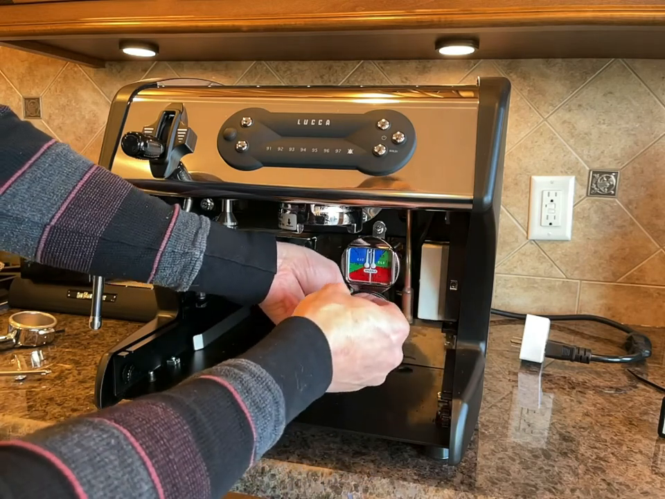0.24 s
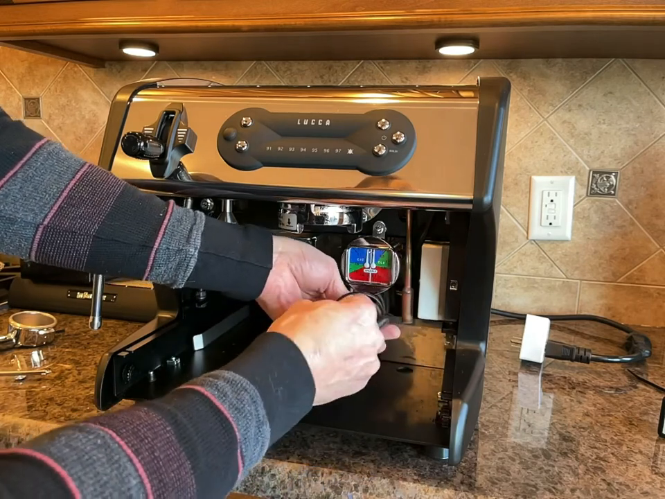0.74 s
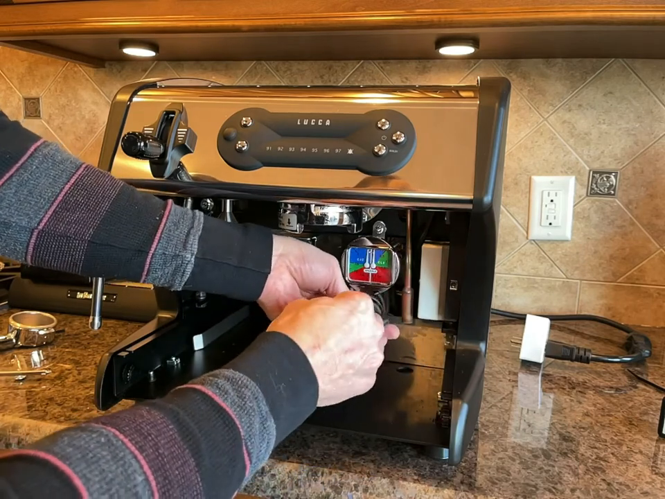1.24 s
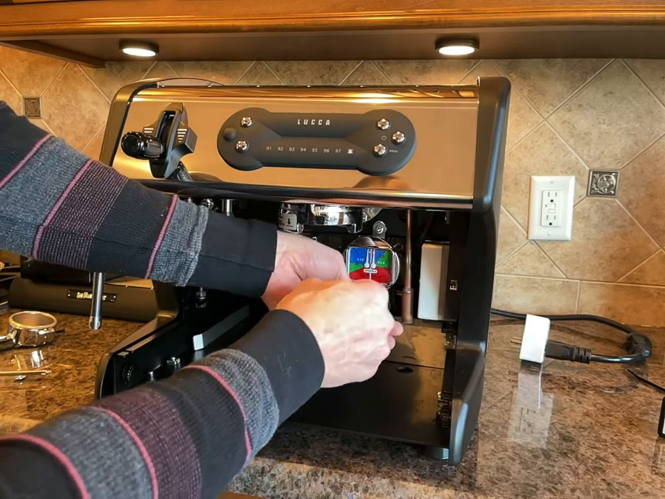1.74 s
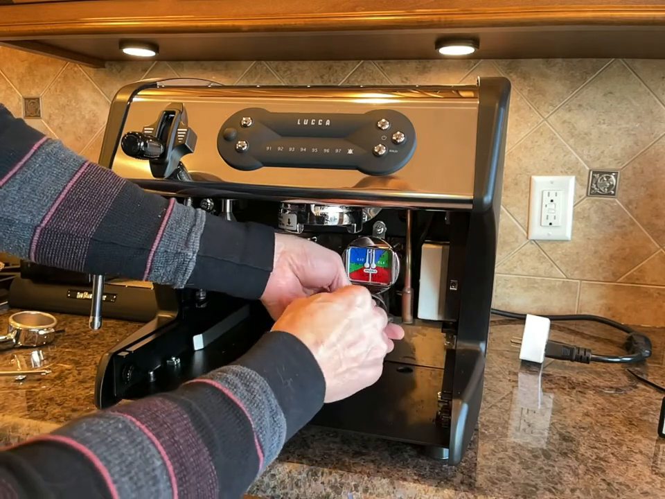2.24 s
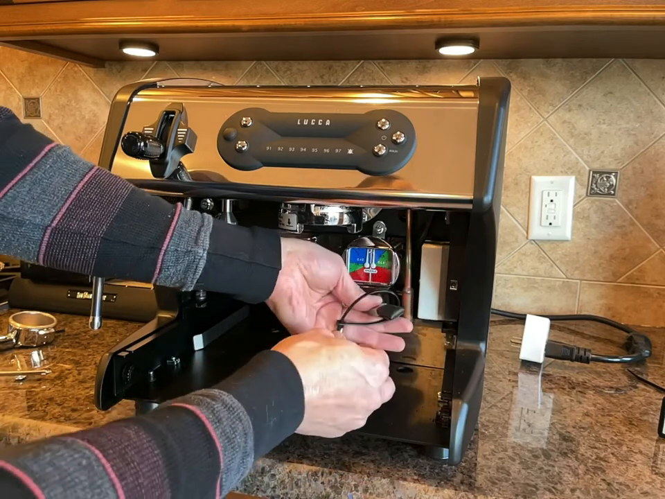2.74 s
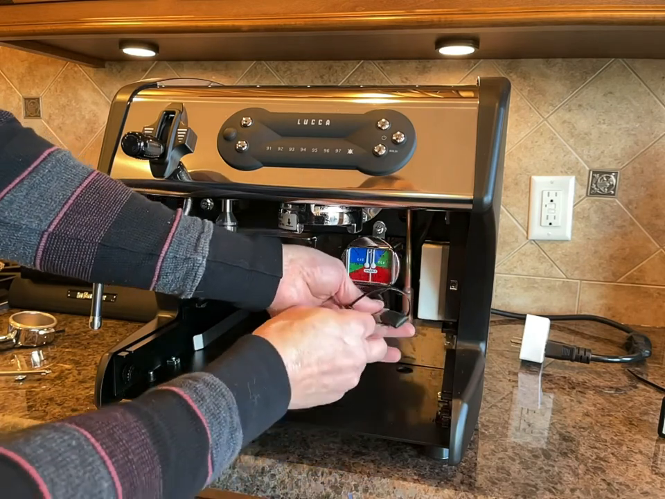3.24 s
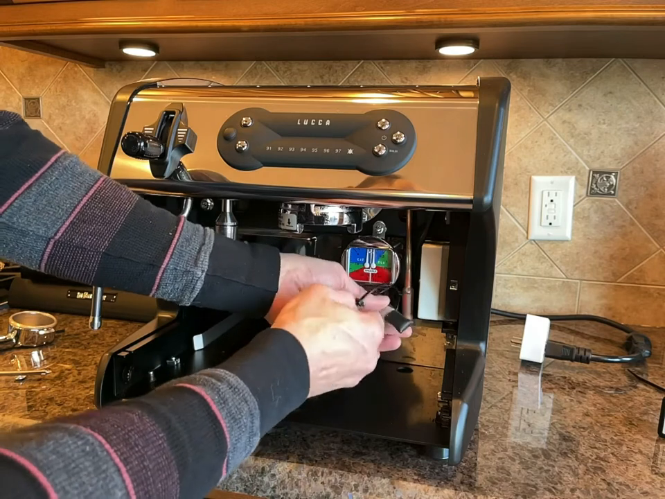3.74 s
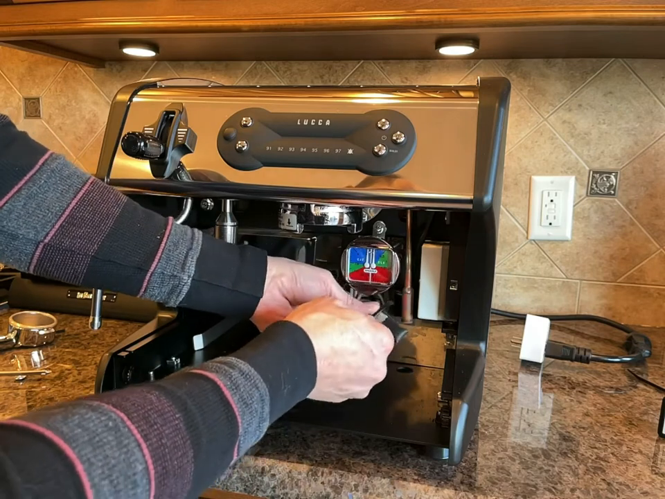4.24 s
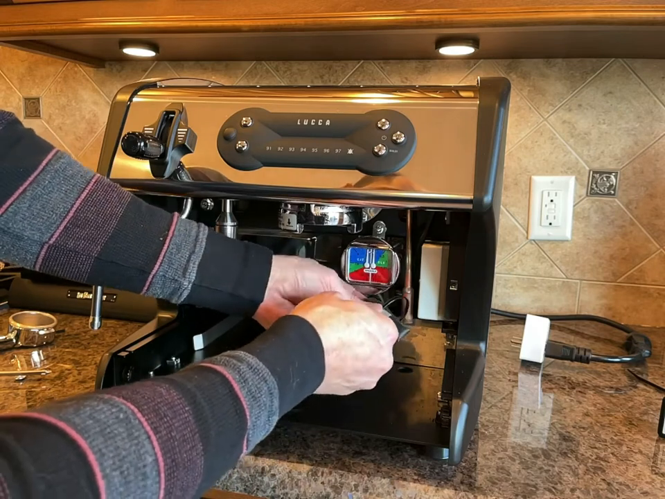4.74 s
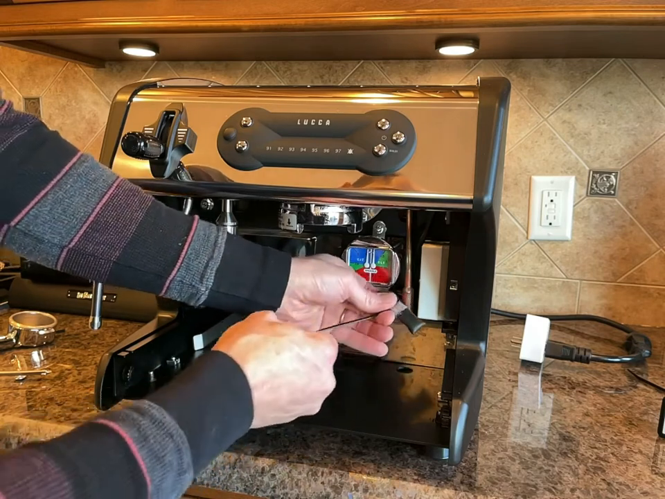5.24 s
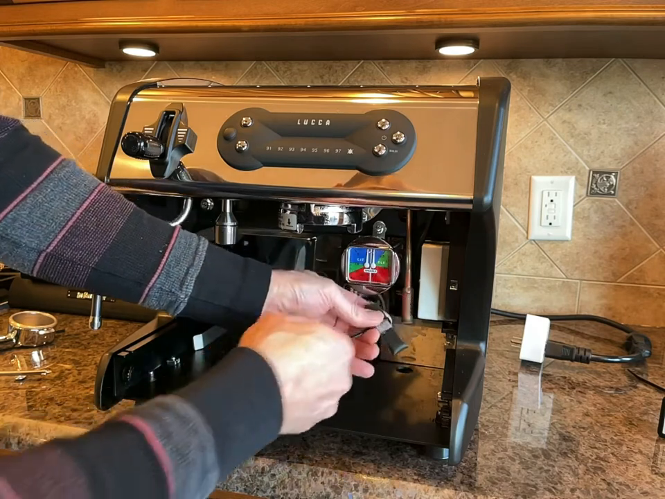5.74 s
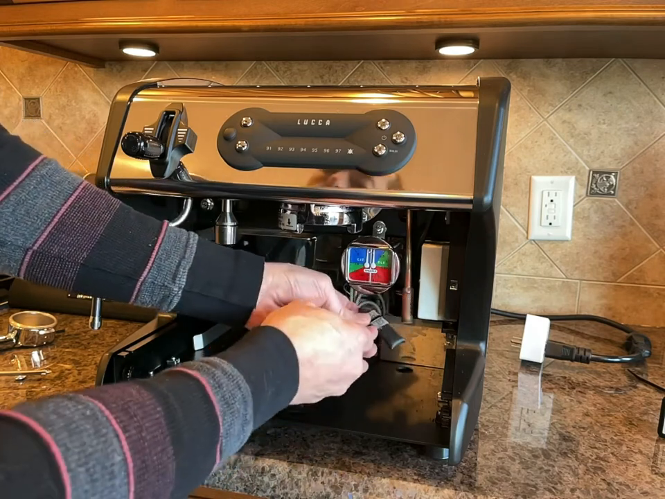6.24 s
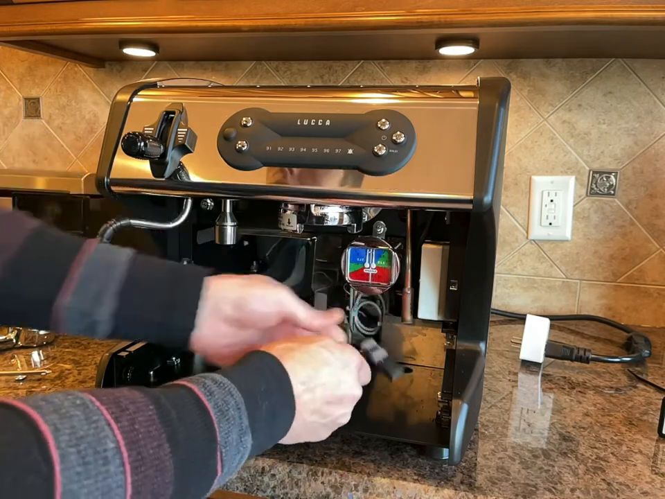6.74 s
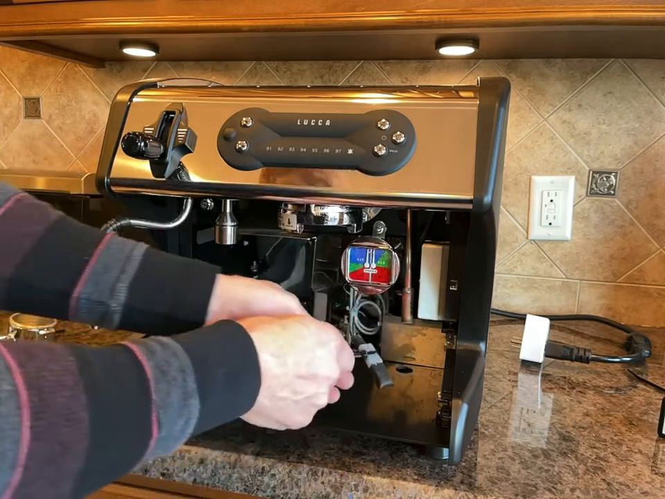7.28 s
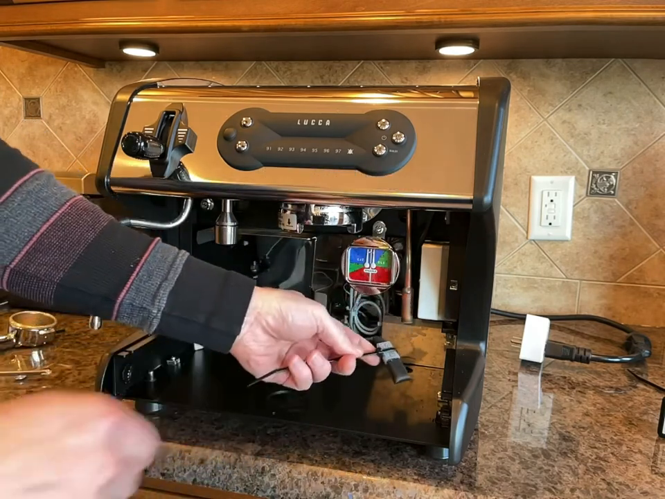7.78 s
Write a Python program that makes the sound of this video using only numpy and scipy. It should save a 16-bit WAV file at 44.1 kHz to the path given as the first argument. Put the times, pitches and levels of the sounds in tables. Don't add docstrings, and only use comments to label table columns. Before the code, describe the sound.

A quiet tiled kitchen, heard from about a metre away, with soft ventilation air and a low, steady compressor hum throughout. Skin and sleeves rustle faintly; around 0.55 to 0.7 seconds the loose plastic end taps and rattles in a quick flicker. Three crisp, bright clicks come at 1.3 to 1.4, then three more separate snaps at 1.9, 2.0 and 2.2. From 2.4 to 4.6 there is mostly gentle rubbing, tiny taps and one very faint click. At 4.8 a hurried run of clicks bursts into a fast ratcheting zip, dense at first and slowing as it tightens until 5.3, with soft frame knocks, then spaced snaps until 5.55. Light touches follow. Five slower, slightly weaker clicks fall between 6.3 and 6.6. Faint scrapes and taps come near 6.8 and 7.6, with quiet rustling until the end at about 8.

```python
import sys
import numpy as np
from scipy import signal
from scipy.fft import rfft, irfft, next_fast_len
from scipy.io import wavfile
from scipy.ndimage import uniform_filter1d, map_coordinates

SR = 44100
rng = np.random.default_rng(int(sys.argv[2]) if len(sys.argv) > 2 else 0)


def ratio(d):
    e = np.asarray(d, float) / 20
    return 10 ** e


def master(y):
    cut = np.clip(np.atleast_2d(y).T, -1, 1)
    pcm = np.round(cut * 32767)
    wavfile.write(sys.argv[1], SR, pcm.astype(np.int16))


N = 353241


def unit(x):
    return x / np.sqrt(np.mean(x ** 2) + 1e-20)


def along(points, hz):
    f, v = np.transpose(points)
    return np.interp(np.log(hz + 1), np.log(f + 1), v)


def wobble(rate):
    points = rng.standard_normal(int(N * rate / SR) + 4)
    return map_coordinates(points, [np.arange(N) * rate / SR])


def filtered(x, response):
    size = next_fast_len(N + 8192)
    hz = np.fft.rfftfreq(size, 1 / SR)
    return irfft(rfft(x, size) * response(hz), size)[:N]


def noise(spectrum):
    return unit(filtered(rng.standard_normal(N), lambda hz: ratio(along(spectrum, hz))))


def body(modes, f, low_hz=150):
    power = sum(ratio(2 * db) / (1 + ((f - c) / w) ** 2) ** 2 for c, w, db in modes)
    low_cut = (f ** 2 / (f ** 2 + low_hz ** 2)) ** 2
    cepstrum = irfft(np.log(power * low_cut + 1e-9) / 2)
    half = cepstrum.shape[-1] // 2
    fold = np.r_[1, np.full(half - 1, 2), 1, np.zeros(half - 1)]
    return np.exp(rfft(cepstrum * fold))


def placed(when, shapes):
    start = np.round(np.asarray(when) * SR).astype(int)
    at = start[:, None] + np.arange(shapes.shape[1])
    return np.bincount(at.ravel(), shapes.ravel(), N)[:N]


def snaps(rows, chance, slip_ms, lag, trim_db, even=0.95, flex=0.022, ring_db=-2.66):
    # pitch_hz, width_hz, level_db
    pawl = [(10100, 1600, -19.5), (11170, 570, -0.5)]
    tip = [(12160, 560, 0.0022), (13650, 1800, 0.012), (14670, 370, 0)]
    strap = [(6000, 1200, -11), (7500, 700, -6), (8600, 650, 0), (9500, 600, 0)]
    head = [(1670, 480, -17.5), (3320, 860, -11), (4900, 2430, -11)]
    lag_ms = [0.285, 0.0, 0.295, 0.618]
    ring_width_hz = 340
    spread_hz = 1500

    rows, size = np.asarray(rows, float), chance.shape[-1]
    f = np.fft.rfftfreq(size, 1 / SR)
    u = np.arange(size) / SR * 1000 / slip_ms
    slips = rfft(chance * np.sqrt(u + 0.81) * np.exp(-2 * u ** 2))
    slips = slips / np.abs(slips) ** np.clip(even, 0, 1)
    levels = rows[:, 1:2] + np.c_[0 * rows[:, 0], rows[:, 2:5]] + trim_db
    bend = 1 + np.reshape(flex, (-1, 1)) * unit(chance[:, :, -1:])
    shapes = 0
    for k, part in enumerate((pawl, tip, strap, head)):
        modes = [(c * bend[:, k], w, db) for c, w, db in part]
        if part is head:
            modes.append((rows[:, 5:], ring_width_hz, ring_db))
        delay = np.exp(-2j * np.pi * f * lag * lag_ms[k] / 1000)
        ring = irfft(body(modes, f, low_hz=800) * slips[:, k] * delay, size)
        ring = ring / np.linalg.norm(ring, axis=1, keepdims=True)
        peak = np.abs(signal.hilbert(ring)).max(axis=1).mean()
        shapes = shapes + ratio(levels[:, k:k + 1]) * ring / peak
    power = uniform_filter1d(np.abs(rfft(shapes)) ** 2, int(spread_hz * size / SR) + 1, axis=1)
    around = irfft(np.sqrt(np.abs(power)) * slips[:, 0] / np.abs(slips[:, 0]), size)
    fade = np.hanning(2 * size)[size:]
    return np.array([placed(rows[:, 0], v * fade) for v in (shapes, around)])


def room_tone():
    # pitch_hz, level_db per Hz
    air = [(62, -25), (105, -9.5), (124, -10.5), (216, -7), (472, -17.5), (547, -18), (608, -17),
           (676, -23), (720, -20.5), (1870, -30), (15200, -46), (16500, -59.5)]
    rumble = [(8, -13.5), (25, -11), (45, -1), (70, -3.5), (100, -11), (125, -47.5)]
    # pitch_hz, level_db (rms), unsteadiness_db
    hum = [
        (75.4, -52, .25),
        (184, -71, 3),
        (204, -71, 3),
    ]
    air_db, rumble_db = -58, -68
    t = np.arange(N) / SR
    out = np.zeros(N)
    for hz, db, shake_db in hum:
        level = ratio(db + 3.0 + shake_db * wobble(2.3))
        out += level * np.sin(2 * np.pi * hz * t + 0.15 * shake_db * wobble(4.9))
    out += ratio(air_db + 0.67 * wobble(7.4)) * noise(air)
    return out + ratio(rumble_db) * noise(rumble)


def rub():
    # peak_s, level_db, brightness_db, fade_s
    strokes = [(.05, -75, -18, 0.33), (0.234, -60, -9, 0.017), (.53, -67, -7, 0.18), (.611, -58, -3, 0.09),
               (0.673, -47.5, 8, 0.024), (.72, -69, 10, 0.088), (.846, -62.5, -9, 0.11),
               (.99, -84, 15.5, 0.065), (1.259, -61, -9, 0.039), (1.598, -64.5, -1.5, 0.063),
               (1.834, -62.5, -9.5, .03), (2.438, -60.5, -2, 0.06), (2.694, -79, 15, 0.07),
               (2.911, -67, 0, 0.13), (3.071, -64.5, -1.5, 0.088), (3.257, -58.5, 2, 0.075),
               (3.346, -73.5, 10.5, 0.059), (3.516, -77.5, 20.5, 0.12), (3.592, -70.5, 12, 0.045),
               (3.728, -66, 5, 0.13), (3.967, -71, 2, .15), (4.147, -60, -2.5, 0.047),
               (4.238, -76, 21.5, 0.033), (4.288, -67.5, -1, 0.23), (4.366, -67, -0.5, .06),
               (4.6, -82.5, -3, 0.56),
               (5.68, -71, 3, 0.066), (5.761, -59, 5.5, 0.043), (5.913, -70, 4, 0.15),
               (6.084, -56, -14, 0.061), (6.154, -73, 8.5, 0.16), (6.69, -66.5, -7, 0.066),
               (6.777, -57, -0.5, 0.049), (7.329, -68.5, 3.5, 0.18), (7.472, -63, 3, 0.15),
               (7.55, -61.5, 4.5, 0.085), (7.919, -67.5, -0.5, 0.45)]
    # pitch_hz, level_db per Hz
    dull = [(530, -70.5), (900, -4), (1410, 0.5), (1620, -1.5), (2930, -1.5), (4180, -6.5), (8000, -12.5),
            (10400, -82.5), (17600, -120)]
    bright = [(1760, -39.5), (3000, -12.5), (5090, -9), (5700, -11), (6570, -7), (9940, -11), (11100, -4),
              (14100, -11.5), (15900, -6), (16500, -26)]
    resting_db = [-88.5, -86]
    fade_db, rise_share = 21, 1
    t = np.arange(0, N + 64, 64) / SR
    s, db, bright_db, fade = np.transpose(strokes)[:, :, None]
    swell_db = db - fade_db * np.maximum((t - s) / fade, (s - t) / fade / rise_share)
    out = np.zeros(N)
    for stroke_db, idle_db, colour in zip((swell_db, swell_db + bright_db), resting_db, (dull, bright)):
        gain = np.sqrt(ratio(2 * idle_db) + ratio(2 * stroke_db).sum(axis=0))
        grain = ratio(1.0 * wobble(70) + 1.6 * wobble(300))
        out += np.interp(np.arange(N) / SR, t, gain) * unit(noise(colour) * grain)
    return out


def taps():
    # start_s, pawl_peak_db, head_over_pawl_db, head_ring_hz
    touches = [(0.2262, -58, -6, 1823), (0.4198, -53, 19.5, 2380), (0.544, -32, 0, 4610),
               (0.8294, -54, 18.5, 2320), (0.853, -56, 23, 2350), (1.2543, -47, 7, 2730),
               (2.407, -71, 24, 2600), (2.4298, -51, 14, 1540), (2.6978, -56, 17, 3050),
               (2.6985, -73, 33, 1530), (3.261, -44, 10, 4420), (3.3414, -61, 5, 3080),
               (3.5107, -46, -5, 3640), (3.7856, -62, 12, 1860), (4.0395, -53, 6.5, 1470),
               (4.1377, -64, 18, 2130), (4.5943, -65.5, 4, 1350), (5.736, -43, -13, 2200),
               (5.7457, -43, -13, 5170), (5.7677, -58, 25, 1530), (5.9065, -44.5, 13, 2680),
               (6.0597, -79, 34, 1720), (6.081, -72.5, 28, 1640), (6.707, -56.5, 13, 2816),
               (6.75, -60, 11, 4140), (6.7914, -65, 25, 4290), (7.5671, -41, -24, 4290),
               (7.5841, -41.5, 10, 2640)]
    rattle = [
        (0.6218, -30, -4, 4010),
        (0.6383, -50.5, 17, 2726),
        (0.6513, -27, -3, 2800),
        (0.6617, -42.5, 11, 2330),
        (0.6696, -28, -5, 2300),
        (0.6794, -38, -9, 3660),
        (0.6846, -29.5, 2, 2450),
        (0.699, -38, 1, 2460),
    ]
    s, db, head_db, hz = np.transpose(touches + rattle)
    tip_db = -0.5 + 0.15 * head_db
    strap_db = -1.5 + 0.26 * head_db
    rows = np.c_[s, db, tip_db, strap_db, head_db, hz]
    chance = rng.standard_normal((len(s), 4, 512))
    return snaps(rows, chance, slip_ms=2.22, lag=0.56, trim_db=[-0.82, -0.78, -2.0, -2.3])


def scrapes(density=0.041):
    # centre_s, half_length_s, level_db (rms), pitch_hz, width_hz
    drags = [
        (0.842, 0.022, -65, 2280, 500),
        (3.223, .02, -63, 2210, 900),
        (6.079, 0.021, -56.5, 2100, 720),
        (6.072, 0.019, -61.5, 2950, 500),
        (6.771, 0.029, -56, 4050, 700),
        (6.792, 0.01, -65, 1650, 251),
        (7.988, 0.033, -67.5, 1570, 500),
    ]
    size = 8192
    t = (np.arange(size) - size // 2) / SR
    f = np.fft.rfftfreq(size, 1 / SR)
    s, half, db, hz, width = np.transpose(drags)[:, :, None]
    strong = rng.random((len(s), size)) < density
    grains = rng.standard_normal((len(s), size)) * (0.21 + strong)
    rung = irfft(rfft(grains) * body([(hz, width, 0)], f), size)
    rung = rung / rung.std(axis=1, keepdims=True)
    return placed(s[:, 0] + t[0], ratio(db) * rung * np.exp(-(t / half) ** 4))


def jolts(when, level_db):
    # pitch_hz, width_hz, level_db
    panel = [(247, 76, 1.5), (478, 230, -10), (1128, 310, -2)]
    knock = irfft(body(panel, np.fft.rfftfreq(2048, 1 / SR)))[:1024]
    knock = knock / np.abs(knock).max()
    level = ratio(level_db + rng.normal(0, 2.6, len(when)))
    return placed(when, level[:, None] * knock)


def teeth():
    # start_s, pawl_peak_db, tip_over_pawl_db
    clicks = [(1.3156, -15, 3), (1.3396, -13, 3), (1.3829, -12.5, 5), (1.895, -10.5, 2), (1.99, -12.5, 3),
              (2.1902, -8.5, -10.5), (4.2318, -39.5, -24), (4.8143, -15.5, 9.5), (4.8281, -18.5, 2.5),
              (4.8396, -15.5, 7.5), (4.851, -17.5, 9.5), (4.8612, -17.5, 12), (4.8717, -23, 5.5),
              (4.881, -16.5, 11.5), (4.8876, -18.5, 10), (4.8939, -18.5, 11), (5.2906, -16.5, -2.5),
              (5.303, -14, 1), (5.3177, -15, 2.5), (5.3442, -18, 8.5), (5.3878, -15.5, 8.5),
              (5.4221, -14.5, 7.5), (5.4482, -14, 7), (5.4968, -18, 0.5), (5.5517, -19, 1),
              (6.2969, -15.5, 3), (6.3384, -18, 3), (6.4064, -20.5, 3), (6.4713, -21.5, 0.5),
              (6.5852, -21, -2)]
    # start_s, strap_over_pawl_db, head_over_pawl_db, head_ring_hz
    grips = [(1.2, -2, -3.5, 2794), (1.7, -9, -10, 2130), (1.95, -2.5, -11, 3420), (2.1, -8, -15, 2378),
             (4.1, -0.5, -4, 3070), (4.7, -5, -5, 4660), (5.285, -5, -13.5, 2500), (5.33, -4.5, -6.5, 3560),
             (5.47, 1.1, -5.5, 1700), (6.1, -2, -8.5, 1750), (6.38, 2, -9, 2800)]
    rows, grips = np.array(clicks), np.array(grips)
    held = grips[np.searchsorted(grips[:, 0], rows[:, 0]) - 1]
    chance = rng.standard_normal((len(rows), 4, 512))
    out = snaps(np.c_[rows, held[:, 1:]], chance, slip_ms=1.0, lag=0.41,
                trim_db=[0.61, 0.7, 0.73, -0.12])
    tight = rows[7:25]
    return out + jolts(tight[:, 0], tight[:, 1] - 34)


def pull(drift=0.051, scatter_db=0.14):
    # time_s, teeth_passed
    progress = [(4.8991, 0), (4.9039, 1), (4.9862, 23), (5.0245, 32), (5.0923, 48), (5.1649, 64),
                (5.1865, 68), (5.2726, 82), (5.2807, 83)]
    # time_s, pawl_peak_db, tension (0-1), head_ring_hz
    strength = [
        (4.899, -16.5, 0.38, 2250),
        (4.929, -17, 0.07, 2240),
        (4.953, -19, 0.01, 2310),
        (4.99, -19.5, 0, 2310),
        (5.042, -13.5, 0.39, 2150),
        (5.101, -12.5, 0.68, 1960),
        (5.165, -12, 0.64, 2000),
        (5.231, -11.5, 0.9, 2050),
        (5.281, -10, 1, 2500),
    ]
    slack_db = [9, -1.5, -1]
    taut_db = [1.5, -12, -15.5]
    s, passed = np.transpose(progress)
    pace, tooth = np.gradient(s, passed), np.arange(passed[-1] + 1)
    j = np.clip(np.searchsorted(passed, tooth, "right") - 1, 0, len(s) - 2)
    span = np.diff(passed)[j]
    u = (tooth - passed[j]) / span
    when = s[j] + np.diff(s)[j] * u * u * (3 - 2 * u)
    when = when + span * u * (1 - u) * ((1 - u) * pace[j] - u * pace[j + 1])
    knots, *force = np.transpose(strength)
    db, tension, hz = (np.interp(when, knots, c)[:, None] for c in force)
    pawl_db = db + scatter_db * rng.standard_normal(db.shape)
    parts_db = slack_db + tension * np.subtract(taut_db, slack_db)
    fresh = rng.standard_normal((len(when) + 40, 4, 512))
    chance = signal.lfilter([1], [1, np.clip(drift, .01, 1) - 1], fresh, axis=0)[-len(when):]
    buzz = snaps(np.c_[when, pawl_db, parts_db, hz], chance, slip_ms=0.75, lag=.9,
                 trim_db=[-1.5, 1.0, -1.7, -0.76], even=0.57, flex=[.008, .025, .04, 0.048], ring_db=-6)
    return buzz + jolts(when, db[:, 0] - 37)


def tail(t60, length):
    hz, t, z = signal.stft(rng.standard_normal(length), SR, nperseg=64)
    decay = ratio(-60 * t / along(t60, hz)[:, None])
    h = signal.istft(z * decay, SR, nperseg=64)[1][:length]
    return h / np.linalg.norm(h)


def space(pair, frame_db=-6, kitchen_db=-13):
    # pitch_hz, fade_s
    frame = [(1000, 0.078), (5000, 0.034), (11000, 0.034), (16000, 0.0076)]
    kitchen = [(1000, 1), (4000, 0.56), (9000, 0.33), (12000, 0.31), (16000, 0.18)]
    # delay_ms, level_db
    walls = [
        (4.5, -20.5),
        (11.5, -25),
        (13, -24.5),
    ]
    # pitch_hz, level_db
    tiles = [(1000, -3), (5000, -1), (8500, 3), (11500, 1), (13000, -3.5), (16000, 7)]
    x, around = pair
    out, far = x.copy(), filtered(around, lambda hz: ratio(along(tiles, hz)))
    for start in range(int(.8 * SR) - SR, N, SR):
        near_echo = ratio(frame_db) * np.pad(tail(frame, 4096), (40, 0))
        for ms, db in walls:
            near_echo[round(ms * SR / 1000)] += ratio(db + rng.normal(0, 1.0))
        far_echo = ratio(kitchen_db) * np.pad(tail(kitchen, SR // 2), (200, 0))
        first = max(start, 0)
        for source, echo in ((x, near_echo), (far, far_echo)):
            wet = signal.fftconvolve(source[first:start + SR], echo)[:N - first]
            out[first:first + len(wet)] += wet
    return out


def scene():
    tie = space(taps() + scrapes() + teeth() + pull())
    return (room_tone() + rub() + tie)[None]


def roll_off(x):
    return signal.sosfilt(signal.butter(12, 16970, fs=SR, output="sos"), x)


def record(dry):
    # pitch_hz, level_db
    mic = [(20, 0), (15800, 0), (16050, -28), (17000, -33)]
    heard = filtered(dry[0], lambda hz: ratio(along(mic, hz)))
    return roll_off(heard[None])


dry = scene()
out = record(dry)
master(out)
```